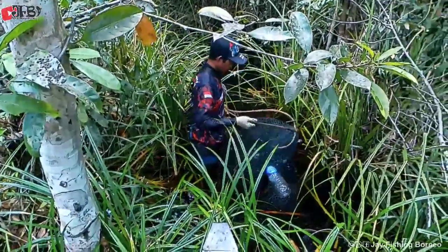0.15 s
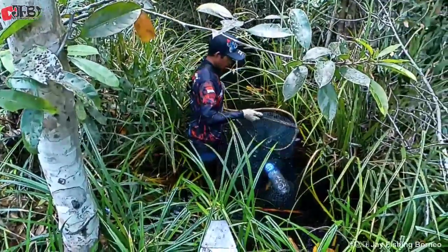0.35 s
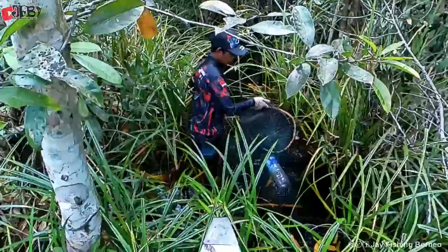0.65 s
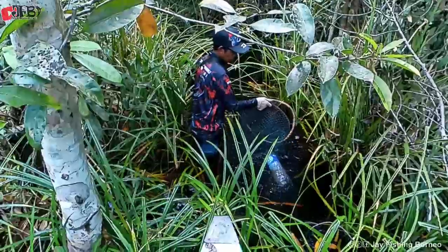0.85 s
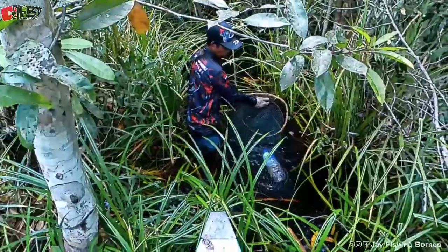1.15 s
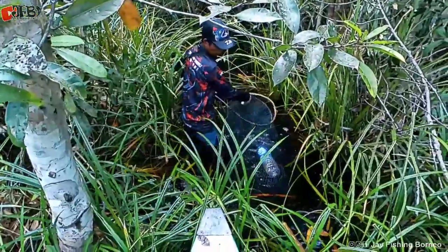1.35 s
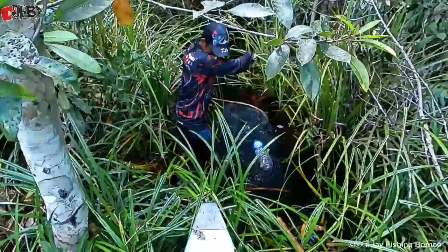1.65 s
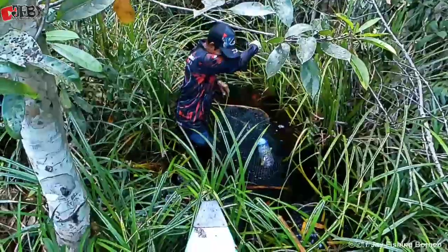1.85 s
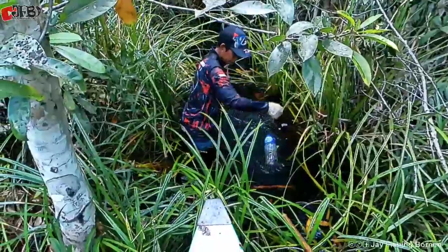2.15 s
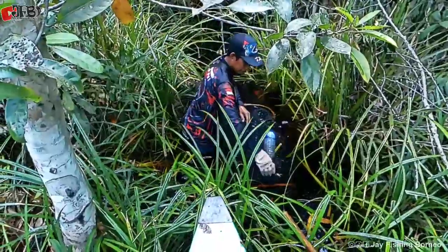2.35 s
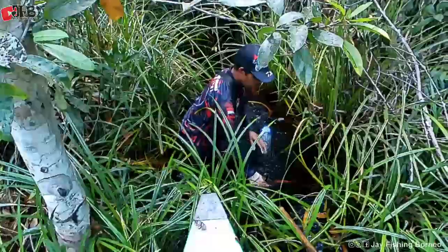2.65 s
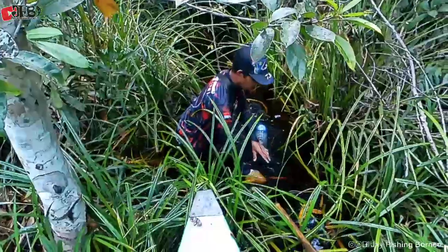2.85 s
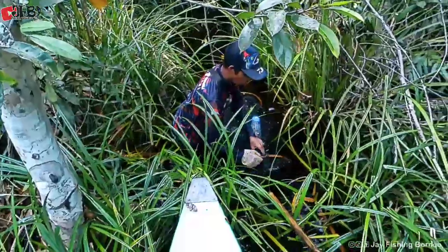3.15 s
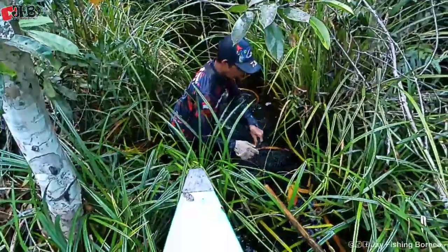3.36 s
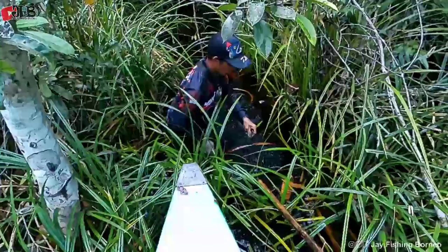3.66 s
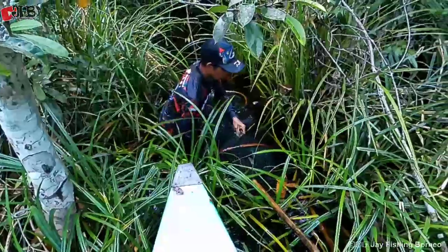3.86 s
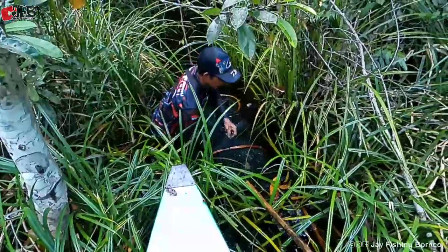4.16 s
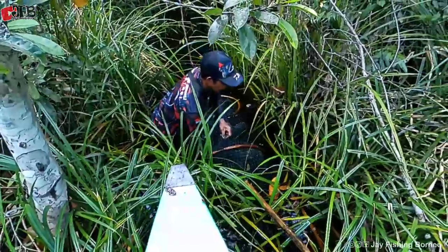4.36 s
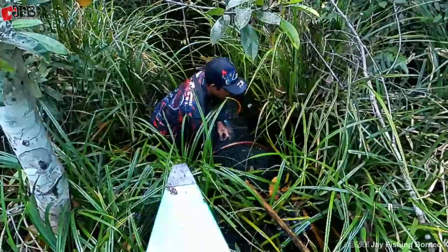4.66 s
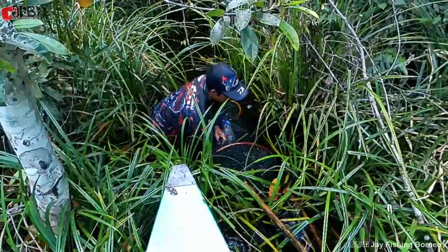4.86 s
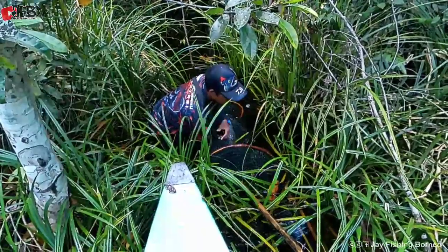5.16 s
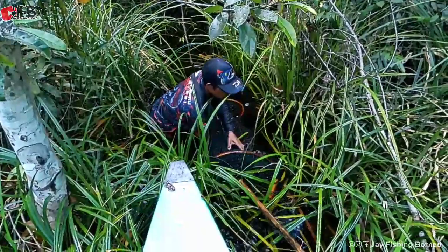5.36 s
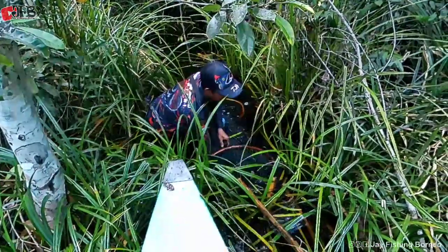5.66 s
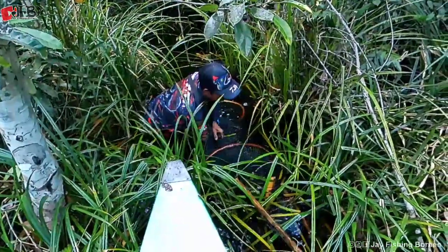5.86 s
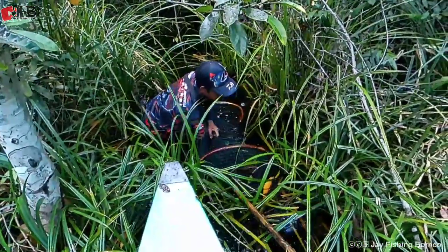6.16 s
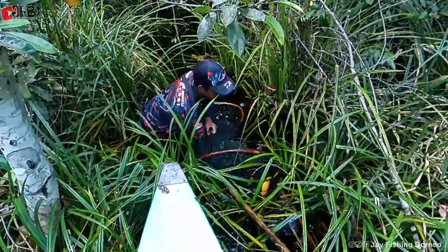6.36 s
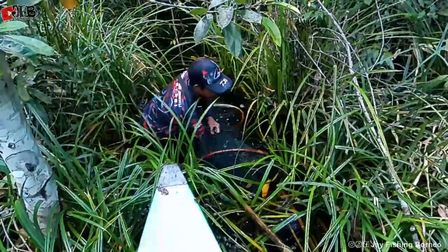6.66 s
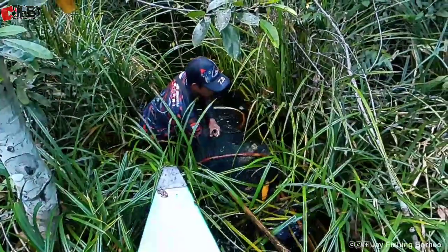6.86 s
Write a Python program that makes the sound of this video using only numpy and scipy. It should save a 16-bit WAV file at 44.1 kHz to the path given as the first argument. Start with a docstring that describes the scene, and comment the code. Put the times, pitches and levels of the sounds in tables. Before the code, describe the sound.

Small splashes and bubbly plops from a net trap moved in swamp water, with faint insects and a brief closing gust on the microphone.

```python
"""Water trickles, slaps and plops as a net trap is lifted and handled in a shallow, grassy swamp.
Each impact on the surface throws spray, and trapped air rings as bubbles; the wet net rustles
and grass swishes as the hands move. A late gust buffets the microphone with low turbulent pressure.
Behind it all the swamp hums and two insect choruses buzz far off."""
import sys
import numpy as np
from scipy import signal
from scipy.io import wavfile
from scipy.ndimage import uniform_filter1d

SR = 44100
rng = np.random.default_rng(int(sys.argv[2]) if len(sys.argv) > 2 else 0)


def master_out(mix):
    """Clip the mix to full scale and print it as 16-bit PCM to the path in sys.argv[1]."""
    frames = np.transpose(np.atleast_2d(mix))
    ceiling = np.clip(frames, -1, 1)
    pcm = np.round(ceiling * 32767).astype(np.int16)
    wavfile.write(sys.argv[1], SR, pcm)


N = 309129

# air trapped under the surface: start_s, level_db, pitch_hz
BUBBLE_RINGS = [(0.066, -43, 1475), (0.356, -53, 743), (0.422, -47, 1770), (0.547, -40.5, 1650),
                (0.645, -44, 950), (0.66, -37, 930), (0.688, -41.5, 940), (0.688, -36, 1525),
                (0.695, -32, 464), (0.702, -40, 3640), (0.749, -51, 1530), (0.79, -43, 175.5),
                (1.282, -45, 1550), (1.523, -45, 740), (1.836, -40.5, 1430), (1.841, -37, 435),
                (1.848, -37, 137), (2.207, -14.5, 1510), (2.209, -19.5, 432), (2.211, -15, 154),
                (2.302, -45.5, 1450), (2.449, -42, 455), (2.451, -41, 920), (2.539, -38, 483),
                (2.549, -37, 570), (2.579, -38, 1440), (2.582, -38, 840), (2.593, -38, 1680),
                (2.673, -38, 830), (2.686, -40.5, 800), (2.712, -40.5, 1540), (3.039, -31.5, 1200),
                (3.175, -37, 1850), (3.177, -43.5, 820), (3.239, -33.5, 1527), (3.25, -37, 1300),
                (3.265, -40.5, 1830), (3.477, -40.5, 1690), (3.72, -44, 1550), (3.722, -36.5, 780),
                (3.811, -33, 1440), (3.833, -32, 920), (3.819, -42.5, 2400), (3.871, -42, 1390),
                (3.877, -36.5, 1540), (3.881, -34, 672), (3.884, -25, 275), (3.893, -34, 2760),
                (3.916, -44, 280), (3.959, -43.5, 876), (4.053, -45, 1690), (4.054, -29, 544),
                (4.138, -33, 346), (4.189, -19, 1710), (4.198, -35, 327), (4.224, -41, 1800),
                (4.265, -37.5, 670), (4.282, -42, 660), (4.325, -43.5, 960), (4.457, -36.5, 705),
                (4.458, -43.5, 1330), (4.525, -37.5, 398), (4.59, -40.5, 1560), (4.691, -38, 372),
                (4.695, -32.5, 1580), (4.696, -29, 833), (4.836, -43, 770), (4.991, -40, 1790),
                (4.997, -36, 250), (5.407, -33.5, 1370), (5.408, -38, 796), (5.442, -47, 1320),
                (5.492, -44, 860), (5.558, -42.5, 800), (5.56, -44, 1360), (6.105, -41, 464),
                (6.562, -37.5, 840), (6.586, -34, 1365), (6.612, -46.5, 1480), (6.659, -37.5, 1506),
                (6.925, -43, 763), (6.94, -38, 785), (6.957, -40.5, 1830), (6.968, -42, 955)]


def bubbles():
    """Minnaert resonance: trapped air rings as a spring, its pitch climbing as it nears the surface."""
    t, out = np.arange(SR // 4) / SR, np.zeros(N + SR // 2)
    chances = rng.random((len(BUBBLE_RINGS), 2, 2))
    for (start_s, level_db, pitch_hz), shed in zip(BUBBLE_RINGS, chances):
        # big, low bubbles ring longer; hard-struck ones burst sooner
        t60_s = 0.02933 * (1000 / pitch_hz) ** 0.26 * np.exp(-0.03 * (level_db + 35))
        family = [(start_s, level_db, pitch_hz)]
        for lag, detune in shed:   # two fainter bubbles break away
            family.append((start_s + 0.1685 * t60_s * lag, level_db - 12.5,
                           pitch_hz * (0.852 + 0.41 * detune)))
        climb = 1 + 0.09 * t / max(t60_s, 0.003)
        envelope = decay(t, t60_s, rise_s=0.54 / pitch_hz, bend=0.97)
        for own_s, own_db, own_hz in family:
            tone = np.sin(2 * np.pi * own_hz * np.cumsum(climb) / SR)
            onset = round(own_s * SR)
            out[onset:onset + len(t)] += from_db(own_db) * envelope * tone
    return out[:N] * from_db(5.6 * np.tanh(drift(240)))   # the wobbling wall roughens the tone


# blows on the water surface: start_s, slap_db, spray_db, slap_t60_s
SURFACE_IMPACTS = [(0.354, -32, -34.5, 0.014), (0.422, -43, -45, 0.018), (0.466, -43.5, -44.5, 0.066),
                   (0.549, -64, -44, 0.027), (0.687, -41.5, -40, 0.07), (0.699, -66, -41, 0.066),
                   (0.855, -53, -74, 0.044), (1.009, -47, -59, 0.093), (1.133, -44.5, -53, 0.031),
                   (1.209, -49, -51, 0.044), (1.284, -44, -65, 0.026), (1.491, -48.5, -73, 0.073),
                   (1.835, -21, -35.5, 0.019), (2.206, -22, -36, 0.019), (2.592, -44, -49, 0.091),
                   (3.188, -45.5, -53, 0.079), (3.478, -36.5, -65, 0.015), (3.723, -30.5, -30, 0.013),
                   (3.809, -44.5, -47.5, 0.1), (3.842, -36, -43, 0.023), (3.886, -38.5, -49, 0.1),
                   (4.051, -37, -69, 0.043), (4.139, -41, -53, 0.038), (4.188, -31.5, -46.5, 0.089),
                   (4.458, -43, -58, 0.039), (4.696, -33.5, -51, 0.022), (4.711, -45, -63, 0.042),
                   (4.749, -40, -64, 0.032), (4.835, -46, -53, 0.16), (4.864, -38, -51.5, 0.038),
                   (4.991, -38, -42, 0.061), (5.271, -48, -50, 0.037), (5.302, -38, -43.5, 0.015),
                   (5.344, -46, -46.5, 0.043), (5.405, -42.5, -48.5, 0.16), (5.722, -44, -50, 0.022),
                   (6.363, -45, -46.5, 0.062), (6.414, -56, -52, 0.03), (6.695, -57, -51, 0.047),
                   (6.916, -63, -49, 0.03), (6.944, -50, -50, 0.22)]


def splashes():
    """Impact noise: a sharp contact pulse, a dull slap, and spray that cracks first and spits after."""
    t, out = np.arange(SR // 4) / SR, np.zeros(N + SR // 4)
    noise = rng.standard_normal((len(SURFACE_IMPACTS), 3, len(t)))
    slaps = rms_one(band(band(noise[:, 0], 270, 1900), 136, 2460))
    cracks = rms_one(band(noise[:, 1], 1700, 8500))
    contact = band(signal.unit_impulse(len(t)), 400, 2570)
    contact = from_db(-1.5) * contact / np.abs(contact).max()
    for k, (start_s, slap_db, spray_db, t60_s) in enumerate(SURFACE_IMPACTS):
        slap = decay(t, t60_s, rise_s=0.0011) * slaps[k] - contact
        spray_hz = 3060 * (4300 / 3060) ** rng.random()
        spit = resonance(noise[k, 2], spray_hz, 0.44 * spray_hz)
        spit = rms_one(resonance(spit, spray_hz, 1.3 * spray_hz))
        spray = 0.82 * decay(t, 0.0062, rise_s=0.000094) * cracks[k]
        spray += 0.63 * decay(t, 1.62 * t60_s, rise_s=0.0014) * spit
        onset = round(start_s * SR)
        out[onset:onset + len(t)] += from_db(slap_db) * slap + from_db(spray_db) * spray
    return out[:N]


# water and mesh stirred by the hands: time_s, trickle_db, rustle_db
TRAP_MOTION = [(0.0, -55.5, -59), (0.21, -66, -64.5), (0.58, -54, -60), (1.0, -64, -67),
               (1.5, -57.5, -63.5), (2.13, -62.5, -65), (2.38, -53.5, -61.5), (2.62, -60, -64),
               (2.97, -63, -67.5), (3.3, -57, -63), (3.6, -67, -65), (3.9, -51.5, -60.5), (4.1, -59.5, -70),
               (4.76, -58, -61.5), (4.96, -65, -68), (5.23, -63, -63.5), (5.48, -55, -62),
               (5.8, -62, -66.5), (6.42, -58, -61.5), (6.7, -65, -66.5), (7.01, -59.5, -64.5)]


def net_trap():
    """Superposition of tiny events: bubbles merge into a trickle, mesh clicks and drops into a rustle."""
    trickle_db, rustle_db = curves(TRAP_MOTION)
    wash = rms_one(band(rng.standard_normal(N), 700, 1770))
    trickle = rms_one(grains(1200, 247, 2000, ring=20.6, spread_db=4.0) + 0.98 * wash)
    mesh = grains(1800, 1740, 5270, ring=4.3, spread_db=-0.8)
    drops = grains(40, 3400, 4360, ring=34.0, spread_db=3.5)
    return from_db(trickle_db) * trickle + from_db(rustle_db) * (mesh + 0.3 * drops)


# grass brushed aside: centre_s, level_db, half_width_s
GRASS_SWISHES = [(0.637, -68, 0.046), (1.213, -62.5, 0.017), (2.42, -64, 0.036), (2.486, -61, 0.013),
                 (2.596, -63, .03), (4.6, -69, 0.043), (5.932, -61, 0.022), (6.378, -69, 0.059)]


def grass():
    """Friction: blades sliding past one another give brief swells of bright crackle."""
    t = np.arange(N) / SR
    swells = sum(from_db(level_db) * np.exp(-((t - centre_s) / half_width_s) ** 2)
                 for centre_s, level_db, half_width_s in GRASS_SWISHES)
    crackle = grains(6500, 9900, 10700, ring=6.7, spread_db=4.0)
    return swells * rms_one(band(crackle, 7200, 11200))


# gust on the microphone: time_s, level_db
GUST_PRESSURE = [(6.2, -60), (6.36, -48.5), (6.48, -68), (6.58, -48), (6.73, -47), (6.77, -36), (6.84, -37),
                 (6.906, -23), (6.97, -39), (7.01, -37)]


def wind():
    """Turbulent pressure on the diaphragm: a light breeze throughout, then a deep, late gust."""
    white = rng.standard_normal((3, N))
    breeze = rms_one(band(white[0], 1.8, 68.0)) * from_db(1.76 * drift(10.6))
    push = band(white[1], 26.4, 45)
    push /= np.sqrt(uniform_filter1d(push ** 2, SR // 25) + 1e-12)   # pushes without let-up
    eddies = from_db(-17.5) * rms_one(band(white[2], 68, 170))
    blowing = np.arange(N) / SR > GUST_PRESSURE[0][0]
    gust = from_db(curves(GUST_PRESSURE)[0]) * blowing
    return from_db(-56) * breeze + gust * (push + eddies)


# spectrum of the swamp's hum: frequency_hz, relative_density_db
SWAMP_SPECTRUM = [(40,-8),(60,-1),(145,0),(350,-1.5),(800,-8.5),(1500,-31.5),(2600,-13),(4000,-46.5),(5800,-22),(8000,-26.5),(12000,-24),(17000,-21)]


def swamp():
    """Broadband ambient noise: a far hum whose half-octave bands each flicker a little."""
    out, white = 0, rng.standard_normal((2, N))
    edges_hz = 60 * 2 ** np.arange(0, 8.3, 0.5)
    frequency_hz, density_db = np.transpose(SWAMP_SPECTRUM)
    for k, (low_hz, high_hz) in enumerate(zip(edges_hz, edges_hz[1:])):
        band_db = np.interp(np.log(low_hz * high_hz) / 2, np.log(frequency_hz), density_db)
        flicker_db = 3.0 * drift(14.5) * (200 / high_hz) ** 0.24   # the treble is steadier
        out += from_db(band_db + flicker_db) * band(white[k % 2], low_hz, high_hz)
    return from_db(-56) * rms_one(out)


# distant insects: pitch_hz, width_hz, level_db, strokes_per_s, pulse_depth
INSECT_CHORUSES = [(6343, 130, -69.5, 140, 0), (6734, 170, -68.5, 210, 0.2)]


def insects():
    """Narrow resonance turns noise into a buzz; wing strokes modulate the amplitude of one chorus."""
    out, t = 0, np.arange(N) / SR
    for pitch_hz, width_hz, level_db, strokes_per_s, pulse_depth in INSECT_CHORUSES:
        pulses = 1 + pulse_depth * np.sin(2 * np.pi * strokes_per_s * t + 0.92 * drift(1.4))
        buzz = resonance(pulses * rng.standard_normal(N), pitch_hz, width_hz)
        buzz = rms_one(resonance(buzz, pitch_hz, 3.4 * width_hz))
        throb_db = 2.0 * np.sin(2 * np.pi * 18 * t + drift(1))
        swell_db = 0.23 * t + 0.74 * drift(0.83)
        out += from_db(level_db + throb_db + swell_db) * buzz
    return out


def foliage(x):
    """Scattering: nearby stems and leaves add a short, dull tail."""
    t = np.arange(SR // 6) / SR
    tail = band(rng.standard_normal(len(t)), 116, 3600) * decay(t, t60_s=0.05, rise_s=0.024)
    tail /= np.sqrt(np.sum(tail ** 2))
    return x + from_db(-19) * signal.fftconvolve(x, tail)[:N]


def grains(per_s, low_hz, high_hz, ring, spread_db):
    """Shot noise of rms 1: clumps of uneven clicks excite resonators whose Q is about ring / 4."""
    sizes = from_db(spread_db * np.minimum(rng.exponential(1, N), 4)) * rng.choice([-1, 1], N)
    clicks = sizes * (rng.random(N) < per_s * from_db(3 * drift(9)) / SR)
    pitches_hz, struck = np.geomspace(low_hz, high_hz, 14), rng.integers(0, 14, N)
    return rms_one(sum(resonance(clicks * (struck == k) + 1e-18, hz, 3.96 * hz / ring)
                       for k, hz in enumerate(pitches_hz)))


def resonance(x, hz, width_hz):
    """Damped oscillator: a two-pole peak of gain 1."""
    r = np.exp(-np.pi * width_hz / SR)
    gain = (1 - r * r) / 2
    return signal.lfilter([gain, 0, -gain], [1, -2 * r * np.cos(2 * np.pi * hz / SR), r * r], x)


def decay(t, t60_s, rise_s, bend=1):
    """Damping of 60 dB in t60_s under a soft onset; a bend below 1 lengthens the tail."""
    return (1 - np.exp(-t / rise_s)) * from_db(-60 * (t / max(t60_s, 0.003)) ** bend)


def drift(rate_hz):
    """Low-passed noise of rms 1, wandering at up to about rate_hz."""
    step = 40   # samples between points
    r = np.exp(-2 * np.pi * rate_hz * step / SR)
    slow = signal.lfilter([1], [1, -2 * r, r * r], rng.standard_normal(N // step + 2002))[2000:]
    return np.interp(np.arange(N) / step, np.arange(len(slow)), rms_one(slow))


def band(x, low_hz, high_hz):
    """Band-pass filter with a flat passband."""
    return signal.sosfilt(signal.butter(2, [low_hz, high_hz], "band", fs=SR, output="sos"), x)


def curves(rows):
    """Linear interpolation of timed columns to every sample."""
    time_s, *columns = np.transpose(rows)
    return [np.interp(np.arange(N) / SR, time_s, column) for column in columns]


def from_db(db):
    """Amplitude ratio of a level."""
    return 10 ** (np.asarray(db) / 20)


def rms_one(x):
    """Normalisation to rms 1."""
    return x / np.sqrt(np.mean(x ** 2) + 1e-20)


def scene():
    """Superposition in open air: all sources add in one channel."""
    water = foliage(bubbles() + splashes())
    return (water + net_trap() + grass() + swamp() + insects() + wind())[None]


# resonances of the microphone housing: centre_hz, width_hz, lift_db
HOUSING_MODES = [(1464, 197, 3.5), (3894, 420, 3)]
CUTOFF_HZ, DC_OFFSET = 15500, -0.0313


def record(dry):
    """Housing resonance lifts two bands, a low-pass cuts the top, and the converter sits off zero."""
    lifts = sum((from_db(lift_db) - 1) * resonance(dry, centre_hz, width_hz)
                for centre_hz, width_hz, lift_db in HOUSING_MODES)
    low_pass = signal.ellip(12, 0.5, 70, CUTOFF_HZ, fs=SR, output="sos")
    return DC_OFFSET + signal.sosfilt(low_pass, dry + lifts)


dry = scene()
out = record(dry)
master_out(out)
```